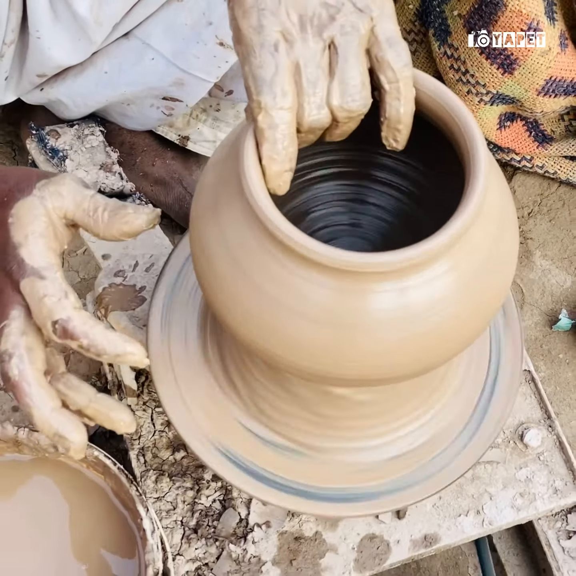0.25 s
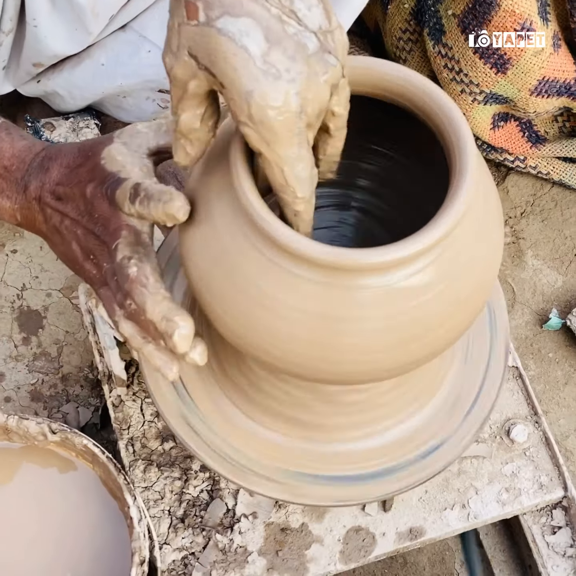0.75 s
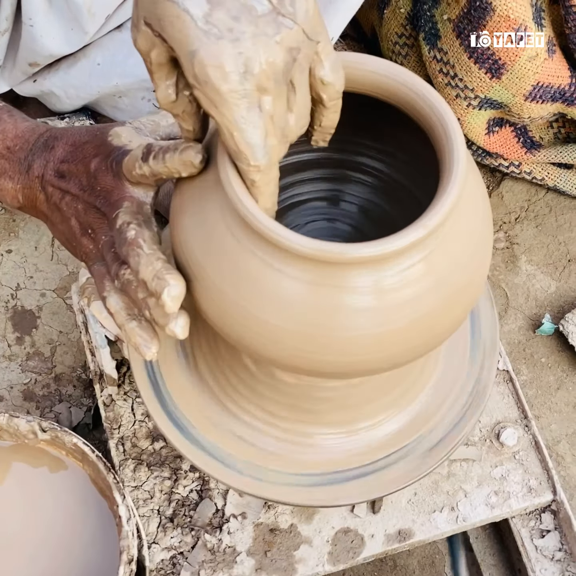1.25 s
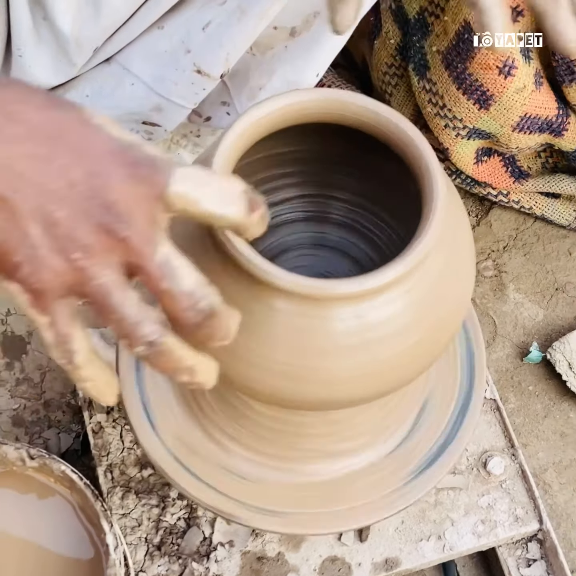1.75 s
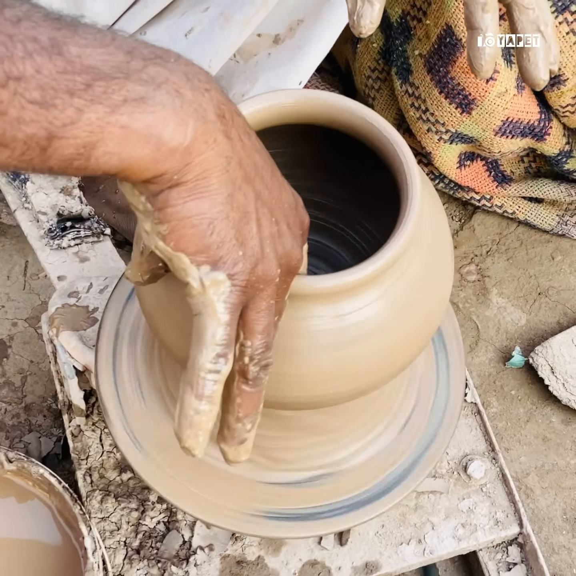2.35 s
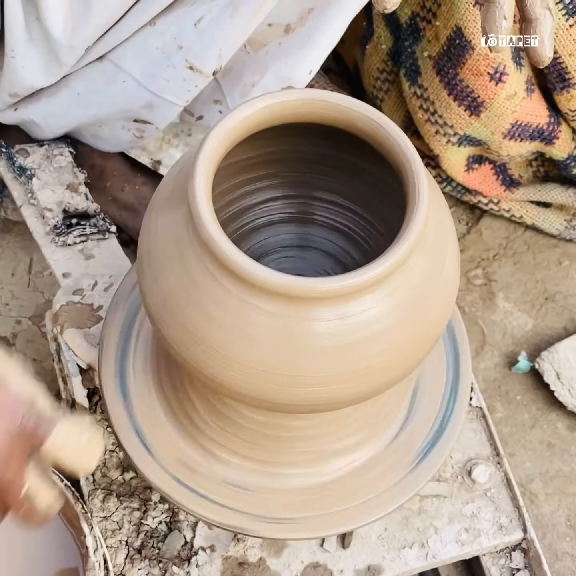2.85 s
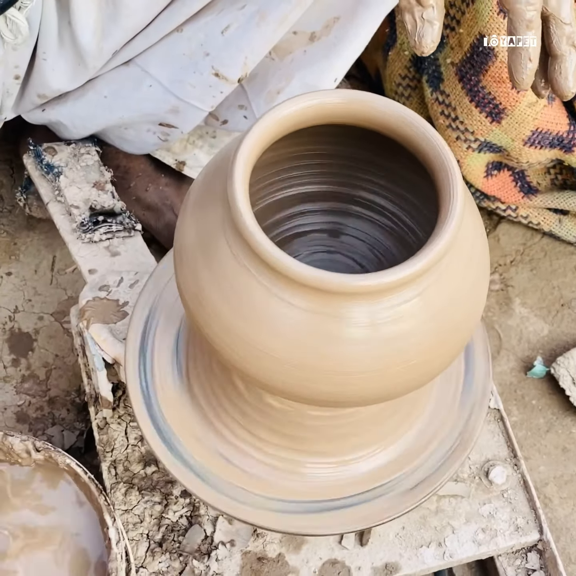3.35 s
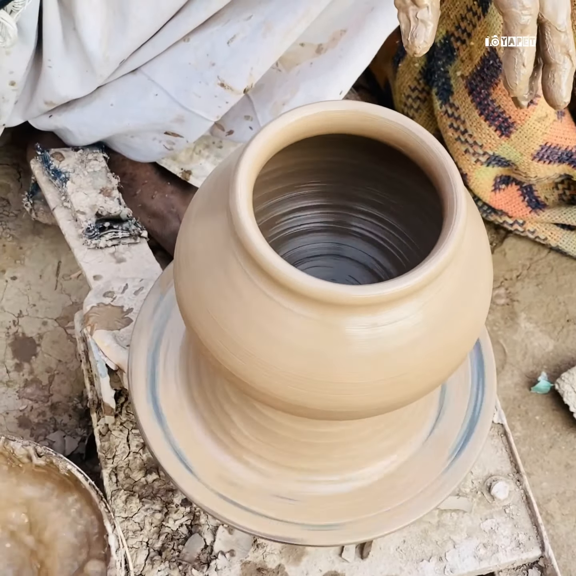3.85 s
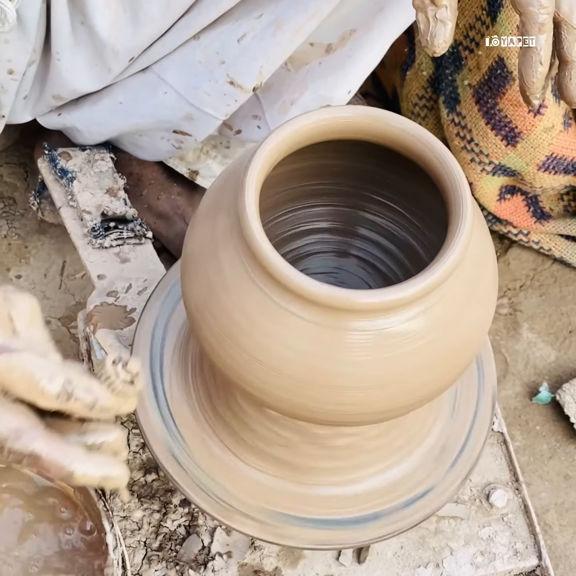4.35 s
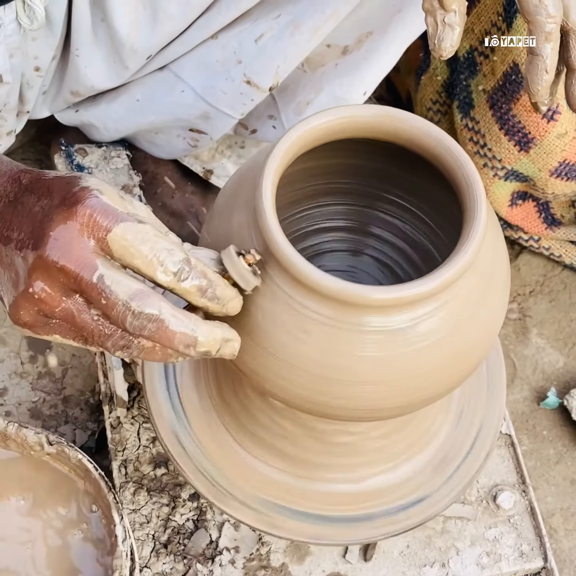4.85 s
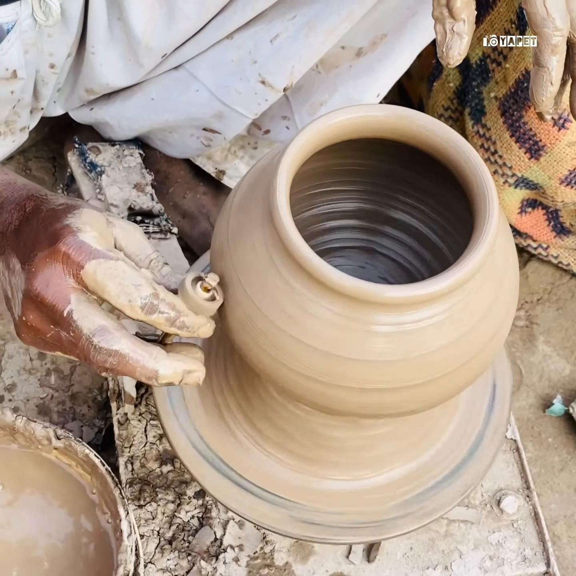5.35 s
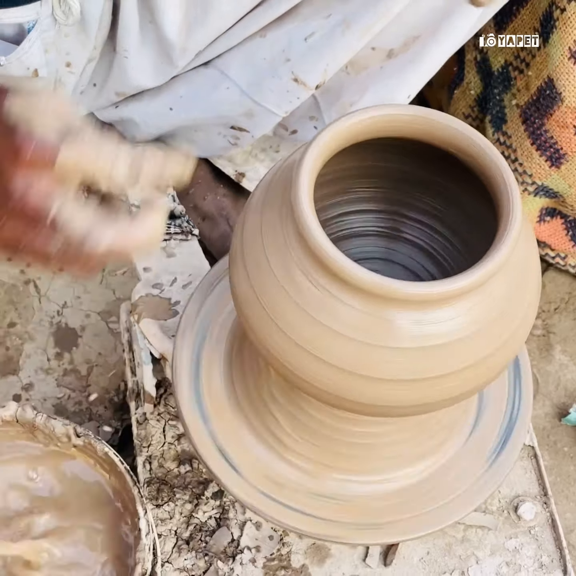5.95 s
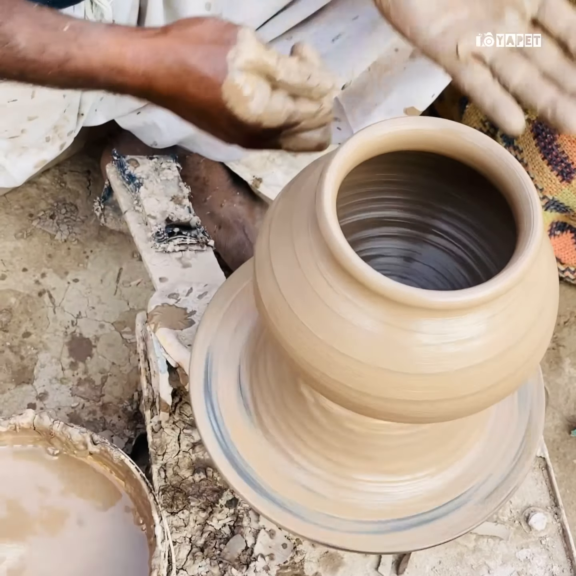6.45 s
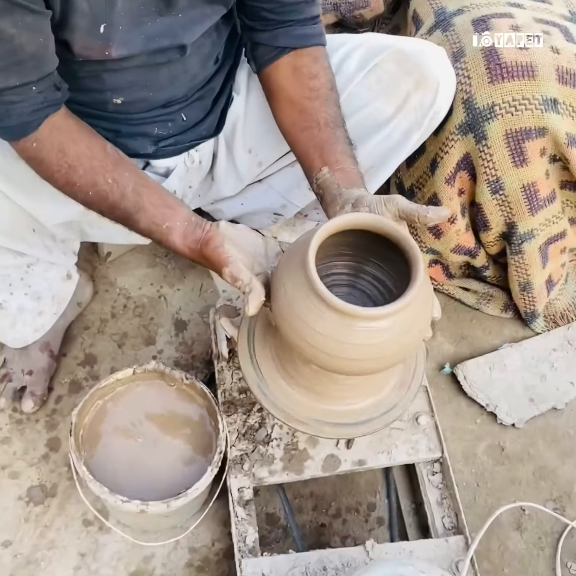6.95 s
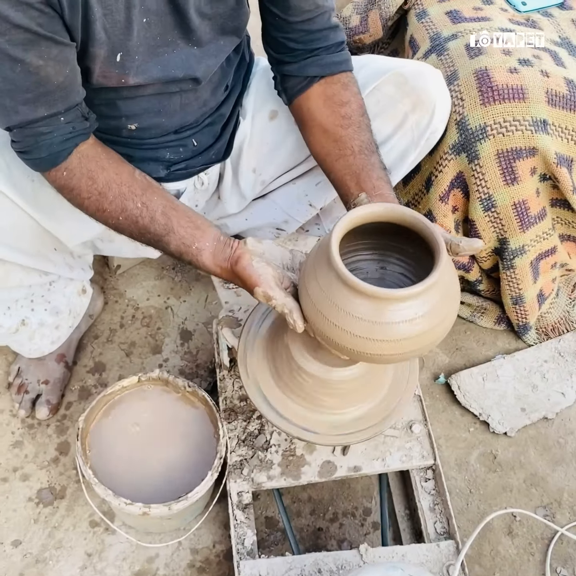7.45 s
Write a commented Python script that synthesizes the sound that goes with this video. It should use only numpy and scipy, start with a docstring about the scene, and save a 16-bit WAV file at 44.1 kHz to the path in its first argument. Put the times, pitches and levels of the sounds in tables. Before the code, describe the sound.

An electric potter's wheel whirs steadily with a throbbing mid-pitched hum, while wet hands make faint ticks, splashes and a few watery plops outdoors.

```python
"""The rolling noise and throbbing hum of an electric potter's wheel in an open yard, with water and far traffic.
Bearing and belt noise rings the motor housing; a loose part hums as wandering tones that throb with the belt.
There is also a thin fading whine, a hiss, and a hollow rush of resonant noise that swells at the end.
Wet hands dip in a bucket: bubbles plop as rising tones, water splashes as noise and drops tick as short tones.
Far traffic lies behind: rumble and tyre roar made of shaped noise, and two engine drones of wavering pitch."""
import sys
import numpy as np
from scipy import signal
from scipy.fft import rfft, irfft, next_fast_len
from scipy.io import wavfile

SR = 44100
rng = np.random.default_rng(int(sys.argv[2]) if len(sys.argv) > 2 else 0)


def log_audio(samples):
    """Write samples as a 16-bit WAV file to the path given in sys.argv[1]."""
    # one column per channel
    frames = np.atleast_2d(samples).T
    # limit to full scale, then quantise
    limited = np.clip(frames, -1, 1)
    pcm = np.round(limited * 32767).astype(np.int16)
    wavfile.write(sys.argv[1], SR, pcm)


N = 339129  # length in samples

# the wheel's drive: time_s, rolling_level_db, hiss_level_db
DRIVE_LEVELS = [(0.0, -33.5, -45.5), (0.5, -33.5, -48), (3.55, -33.5, -48), (4.03, -33.2, -46),
                (4.4, -34.5, -48), (5.4, -34.5, -47.5), (6.75, -33, -47), (7.11, -34, -48),
                (7.69, -31.5, -48)]
# ways the motor housing rings: pitch_hz, width_hz, relative_level_db
HOUSING_MODES = [(530, 98, -10), (595.5, 115, -8), (673, 38, -7), (788.5, 64, -16), (950, 155, -19.5),
                 (1220, 147, -19), (1366, 134, -15), (1493, 230, -22.5), (1789, 35, -19.5),
                 (1910, 40, -7.5), (1987, 88, -10), (2128, 176, -23), (2320, 31.5, -10), (2746, 37, -30),
                 (2973, 83, -26.5), (3320, 50, -27.5), (3653, 170, -28), (3915, 205, -27), (4020, 178, -24),
                 (4246, 127, -25.5), (4840, 81, -36.5), (5650, 250, -36.5), (6690, 160, -42.5),
                 (8430, 72, -32)]
# the hum, swelling unevenly about twice a second: time_s, level_db (before throbs and flicker)
HUM_LEVELS = [(0.0, -33.0), (0.56, -31.5), (0.86, -40), (0.94, -34.5), (1.19, -35), (1.43, -44.0),
              (1.58, -30.5), (1.76, -49.5), (2.04, -30), (2.13, -40.5), (2.42, -34.5), (2.53, -37.5),
              (2.85, -35.5), (3.26, -42.5), (3.5, -31.5), (3.67, -42), (3.98, -31), (4.18, -41.5),
              (4.57, -33.5), (4.85, -50.0), (5.05, -32.5), (5.36, -42), (5.52, -35), (5.69, -38.5),
              (6.04, -34), (6.51, -39.5), (6.66, -33.5), (7.16, -45), (7.31, -32.5), (7.48, -47.5),
              (7.69, -50.0)]
# throbs of the hum, from the belt's turn and a slower pulley: rate_hz, depth_0_to_1, phase_rad
HUM_THROBS = [(8.385, .5, -0.23), (6.52, 0.22, 2.3)]
# a thin whine that fades: time_s, level_db
WHINE_LEVELS = [(0, -51), (1.0, -57), (1.5, -65), (1.9, -77), (7.69, -80)]
# tone colour of the hiss: pitch_hz, relative_level_db (per Hz)
HISS_COLOUR = [(1470, -23), (2500, -2.5), (3410, -13.5), (4160, -4.5), (4610, -12), (7550, -15),
               (8620, -10), (14400, -16.5), (15900, -26)]
# a hollow rush that swells at the end: time_s, level_db
RUSH_LEVELS = [(0, -80), (6.75, -58), (6.95, -46.5), (7.35, -43.5), (7.69, -39)]
# resonances of the rush: pitch_hz, width_hz, relative_level_db
RUSH_RESONANCES = [(365, 38, 5.5), (593, 83, -7.5), (985, 130, -2.5), (1230, 120, -0.5)]
# bubbles in the bucket: start_s, peak_db, start_pitch_hz, pitch_rise_per_s (share of start pitch), fall_60_db_s
BUBBLES = [(3.922, -19.5, 1114, 30, 0.04), (4.118, -15.5, 950, 120, 0.019), (4.176, -24.5, 900, 78, 0.044),
           (5.461, -26, 1200, 29.8, .03), (7.515, -26, 890, 30, 0.032)]
# the clearest droplets and wet chirps: centre_s, peak_db, pitch_hz, length_s
DROPLETS = [(0.047, -31.5, 8730, 0.018), (0.06, -34, 3760, 0.01), (0.065, -36.5, 7360, 0.021),
            (0.073, -37, 3590, 0.006), (0.218, -45, 8530, 0.016), (0.978, -42, 8830, 0.0099),
            (1.015, -41.5, 7200, 0.022), (1.241, -43, 8560, 0.017), (1.651, -42, 8750, 0.006),
            (2.258, -42, 8510, 0.015), (2.321, -41, 8560, 0.006), (2.474, -37, 6640, 0.008),
            (2.517, -43, 6930, 0.009), (3.141, -41, 7590, 0.007), (3.488, -41, 8410, 0.006),
            (3.679, -42, 11290, 0.022), (3.896, -34, 2930, 0.008), (3.91, -34, 4860, 0.01),
            (3.916, -45, 6680, 0.024), (3.922, -31, 5080, 0.0055), (3.947, -37, 7590, 0.006),
            (3.968, -39, 8600, 0.018), (4.029, -46, 6860, 0.016), (4.056, -44, 11150, 0.013),
            (4.067, -43, 7830, 0.005), (4.076, -39, 4620, 0.005), (4.076, -42, 6310, 0.006),
            (4.108, -31, 6200, 0.004), (4.113, -39, 6000, 0.004), (4.14, -27, 10300, 0.003),
            (4.173, -38, 13330, 0.005), (4.183, -32, 9360, 0.003), (4.193, -39, 5070, 0.005),
            (4.33, -37.5, 8620, 0.012), (5.136, -42, 5260, 0.009), (5.518, -42, 7660, 0.014),
            (5.743, -42, 6790, 0.009), (5.831, -39, 13300, 0.007), (6.245, -37, 3430, 0.009),
            (6.245, -42, 4610, 0.02), (6.25, -36, 7200, 0.053), (6.251, -42, 10630, 0.019),
            (6.252, -43, 14120, 0.019), (6.26, -42, 8850, 0.019), (6.376, -42, 8120, 0.021),
            (6.403, -41, 8430, 0.008), (6.501, -40, 5760, 0.006), (6.551, -41, 4910, 0.03),
            (6.705, -41, 11000, 0.007), (6.78, -40, 6300, 0.017), (6.807, -39.5, 5190, 0.028),
            (6.89, -41, 5100, 0.009), (6.92, -45, 4700, 0.005), (6.99, -40, 8480, 0.015),
            (7.034, -44, 8460, 0.01), (7.143, -44, 4680, 0.01), (7.302, -39, 6750, 0.015),
            (7.338, -36, 8000, 0.01), (7.522, -36, 7600, 0.025), (7.523, -37.5, 4820, 0.029),
            (7.672, -37, 9000, 0.009), (7.678, -39, 4770, 0.009)]
# broad splashes and smacks of wet skin: centre_s, level_db, length_s
WATER_SPLASHES = [(0.06, -43, .035), (2, -46, .03), (2.09, -46, 0.011), (3.07, -47, .01),
                  (3.252, -45, .015), (3.625, -43, 0.011), (3.678, -42, .012), (3.852, -45, 0.027),
                  (3.892, -44, .008), (3.923, -44, .035), (3.962, -41, .02), (4.05, -48, .015),
                  (4.074, -40, 0.0064), (4.137, -38, .008), (4.158, -45, 0.025), (4.196, -43, 0.018),
                  (5.118, -46, 0.028), (5.465, -47, .01), (5.83, -44, .015), (6.25, -45, .035),
                  (6.381, -51, 0.045), (6.55, -47, .025), (6.69, -47, 0.036), (6.788, -40, .025),
                  (7.342, -41, .02), (7.363, -45, .008), (7.519, -42, .025), (7.665, -45, 0.028)]
# far traffic: time_s, rumble_level_db, roar_level_db
TRAFFIC_LEVELS = [(0, -51, -48.5), (.4, -50, -45), (1.1, -48.5, -49.5), (2.2, -47.5, -48),
                  (3.0, -48.5, -48), (4.3, -51.5, -47), (5.4, -51.5, -50.5), (5.9, -54, -48.5),
                  (6.9, -53.5, -50), (7.69, -52.5, -52)]
# tone colour of the traffic rumble: pitch_hz, relative_level_db (per Hz)
RUMBLE_COLOUR = [(25, -44), (45, -38), (62, -11), (80, -0.5), (110, -3.5), (160, 0.5), (260, -6),
                 (500, -27)]
# tone colour of the tyre roar: pitch_hz, relative_level_db (per Hz)
ROAR_COLOUR = [(120, -21), (220, -4.5), (330, -1), (400, -2.5), (450, -11.5), (800, -9.5), (2000, -19.5),
               (5000, -53)]
# an engine drone: time_s, pitch_hz, level_db (before flicker)
ENGINE_DRONE = [(0, 165.8, -61), (.35, 163, -49.5), (1.1, 154.3, -54.5), (2.2, 165.6, -72), (3.0, 172, -70),
                (3.4, 178, -51), (4.1, 181, -59), (4.5, 186.3, -54.5), (5.4, 187.5, -60.5),
                (7.69, 189, -61.5)]
# a second, lower engine drone: time_s, pitch_hz, level_db (before flicker)
LOW_ENGINE_DRONE = [(0, 100.3, -67), (.6, 100, -58), (1.9, 90, -61), (2.25, 102.4, -58), (2.7, 112, -61),
                    (3.6, 140, -63), (4.3, 148, -60.5), (5.5, 150.7, -56), (6.8, 150, -61.5),
                    (7.69, 151, -71)]

SHAFT_HZ, SHAFT_PHASE_RAD, SHAFT_DEPTH_DB = 27.66, 2.74, 1.0  # the level goes this far up and down
HUM_HZ, PARTNER_BELOW_HZ, WHINE_HZ = 685.4, 23.16, 1667
DROP_BLUR_HZ, WET_BLUR_HZ = 30, 160  # pitch blur of a lone drop, and what a splash adds to it
# tiny drops: steady rate, extra rate at the middle of each splash, length of the extra
SPECKS_PER_S, SPECKS_PER_SPLASH_S, SPRAY_SPREAD_S = 6.0, 110.0, 0.1
BASS_CUT_HZ, TREBLE_CUT_HZ = 45, 16000


def amp(db):
    """Turn decibels into a plain multiplier."""
    return 10 ** (np.asarray(db) / 20)


def rms_one(x):
    """Scale a sound to an average (rms) level of 1."""
    return x / np.sqrt(np.mean(x ** 2) + 1e-20)


def in_time(rows):
    """Join a table's points with straight lines, one curve for each column after the time."""
    time_s, *columns = np.transpose(rows)
    return [np.interp(np.arange(N) / SR, time_s, column) for column in columns]


def drift(rate_hz):
    """Slow chance: noise passed twice through a one-pole low-pass, scaled to a spread of 1."""
    r = np.exp(-2 * np.pi * rate_hz / SR)
    noise = rng.standard_normal(N + SR)
    return rms_one(signal.lfilter([1], [1, -2 * r, r * r], noise)[SR:])  # skip the first second: run-in


def coloured(colour):
    """Noise whose strength at each pitch follows the table; rms 1."""
    size = next_fast_len(N)
    hz, db = np.transpose(colour)
    all_hz = np.linspace(1, SR / 2, size // 2 + 1)
    gain = amp(np.interp(np.log(all_hz), np.log(hz), db))
    return rms_one(irfft(rfft(rng.standard_normal(size)) * gain, size)[:N])


def wavering(hz, waver_hz, rate_hz):
    """A sine of rms 1 whose pitch wanders by chance around hz."""
    pitch = hz + waver_hz * drift(rate_hz)
    return np.sqrt(2) * np.sin(2 * np.pi * np.cumsum(pitch) / SR)


def resonance(x, hz, width_hz):
    """A two-pole filter that rings at one pitch, with gain 1 at its top."""
    r = np.exp(-np.pi * width_hz / SR)
    feed = np.array([1, 0, -1]) * (1 - r * r) / 2
    return signal.lfilter(feed, [1, -2 * r * np.cos(2 * np.pi * hz / SR), r * r], x)


def modes(x, table, patchy_db):
    """Resonances side by side, neighbours in opposite phase, each waxing and waning on its own."""
    total = np.zeros(N)
    for k, (hz, width_hz, db) in enumerate(table):
        level = amp(db + patchy_db * drift(3.7))
        total += (-1) ** k * level * resonance(x, hz, width_hz)
    return total


def swell(centre_s, length_s):
    """A bell-shaped rise and fall around one moment."""
    return np.exp(-8 * ((np.arange(N) / SR - centre_s) / length_s) ** 2)


def shaft(lag_rad):
    """The level swells once a turn of the motor shaft."""
    turn = 2 * np.pi * SHAFT_HZ * np.arange(N) / SR
    return amp(SHAFT_DEPTH_DB * np.cos(turn + SHAFT_PHASE_RAD - lag_rad))


def housing(rolling_db):
    """Dense uneven rolling contacts of bearing and belt excite every mode of the motor housing."""
    contacts = rng.standard_normal(N) * amp(0.6 * drift(170)) * shaft(0)
    ringing = modes(contacts, HOUSING_MODES, patchy_db=0.83)
    band = signal.butter(4, [470, 9500], "band", fs=SR, output="sos")
    return amp(rolling_db) * rms_one(signal.sosfilt(band, ringing))


def hum(partner_db=-9):
    """A loose mode hums and throbs with the belt; a weaker tone just below beats against it."""
    t = np.arange(N) / SR
    throb = 1 + sum(depth * np.cos(2 * np.pi * rate * t + phase) for rate, depth, phase in HUM_THROBS)
    throb = np.maximum(throb, 0.03)  # never quite silent
    main = wavering(HUM_HZ, 6.35, 12.2)
    partner = amp(partner_db) * wavering(HUM_HZ - PARTNER_BELOW_HZ, 5.17, 11.6)
    flickering_level = amp(in_time(HUM_LEVELS)[0] + 1.63 * drift(34))
    return flickering_level * throb * shaft(0.05) * (main + partner)


def whine():
    """A thin sine of slightly wandering pitch that fades away."""
    return amp(in_time(WHINE_LEVELS)[0]) * wavering(WHINE_HZ, 4.9, 17)


def hiss(hiss_db):
    """Shaped noise whose level flickers a little."""
    return amp(hiss_db + 1.08 * drift(26)) * coloured(HISS_COLOUR)


def rush():
    """Noise ringing in a few broad resonances sounds hollow."""
    hollow = modes(rng.standard_normal(N), RUSH_RESONANCES, patchy_db=3.5)
    return amp(in_time(RUSH_LEVELS)[0]) * rms_one(hollow)


def plops():
    """A bubble rings briefly and rises in pitch as it nears the surface."""
    out = np.zeros(N + SR)
    t = np.arange(SR // 10) / SR
    for start_s, db, hz, rise, fall_s in BUBBLES:
        tone = np.sin(2 * np.pi * hz * (t + rise * t * t / 2))
        onset = np.minimum(t / 0.00067, 1)
        out[round(start_s * SR):][:len(t)] += tone * amp(db - 60 * t / fall_s) * onset
    return out[:N]


def drops(rise_per_s=0.86):
    """Each droplet is a short tone rising a little; a random walk of phase blurs its pitch."""
    out = np.zeros(N + SR)
    t = np.arange(-SR // 30, SR // 30) / SR  # time around the droplet's centre
    for centre_s, db, hz, length_s in DROPLETS:
        in_splash = any(abs(centre_s - at) < span / 2 for at, _, span in WATER_SPLASHES)
        blur_hz = DROP_BLUR_HZ + in_splash * WET_BLUR_HZ
        walk = np.cumsum(rng.standard_normal(len(t)))
        phase = 2 * np.pi * hz * (t + rise_per_s * t * t / 2) + np.sqrt(2 * np.pi * blur_hz / SR) * walk
        envelope = amp(db) * np.exp(-8 * (t / length_s) ** 2)
        out[round((centre_s + t[0]) * SR):][:len(t)] += envelope * np.sin(phase)
    return out[:N]


def splashes():
    """Bright grainy noise under a short swell for each splash or smack."""
    grainy = rng.standard_normal(N) * amp(3.3 * drift(400))
    band = signal.butter(2, [3500, 14000], "band", fs=SR, output="sos")
    level = sum(amp(db) * swell(centre_s, length_s) for centre_s, db, length_s in WATER_SPLASHES)
    return rms_one(signal.sosfilt(band, grainy)) * level


def spray(level_db=-46, tick_s=0.0041):
    """Tiny droplets tick at random moments, thicker round each splash, spread over the treble."""
    extra = sum(swell(centre_s, SPRAY_SPREAD_S) for centre_s, _, _ in WATER_SPLASHES)
    rate = SPECKS_PER_S + SPECKS_PER_SPLASH_S * extra
    born = (rng.random(N) < rate / SR) * amp(level_db + 3.0 * rng.standard_normal(N))
    pitch_choice = rng.integers(0, 12, N)  # each droplet gets one of 12 pitches
    soft = np.hanning(round(tick_s * SR))
    t = np.arange(len(soft)) / SR
    out = np.zeros(N)
    for k, hz in enumerate(np.geomspace(4500, 13500, 12)):
        tick = soft * np.sin(2 * np.pi * hz * t)
        out += signal.oaconvolve(born * (pitch_choice == k), tick)[:N]
    return out


def traffic():
    """Far rumble and tyre roar are shaped noise; two engines drone as tones of wavering pitch and level."""
    rumble_db, roar_db = in_time(TRAFFIC_LEVELS)
    hz, drone_db = in_time(ENGINE_DRONE)
    low_hz, low_db = in_time(LOW_ENGINE_DRONE)
    drone = amp(drone_db + 3.8 * drift(11.0)) * wavering(hz, 6.1, 10.83)
    low_drone = amp(low_db + 5.1 * drift(4.6)) * wavering(low_hz, 5.44, 8)
    rumble = amp(rumble_db) * coloured(RUMBLE_COLOUR)
    roar = amp(roar_db) * coloured(ROAR_COLOUR)
    return rumble + drone + low_drone + roar


def scene():
    """Add up the wheel, the water and the far traffic."""
    rolling_db, hiss_db = in_time(DRIVE_LEVELS)
    wheel = housing(rolling_db) + hum() + whine() + hiss(hiss_db) + rush()
    water = plops() + drops() + splashes() + spray()
    return (wheel + water + traffic())[None]


def record(dry):
    """The microphone drops the deep bass; the top is cut steeply."""
    bass_cut = signal.butter(2, BASS_CUT_HZ, "high", fs=SR, output="sos")
    treble_cut = signal.ellip(12, 0.5, 70, TREBLE_CUT_HZ, fs=SR, output="sos")
    return signal.sosfilt(treble_cut, signal.sosfilt(bass_cut, dry))


dry = scene()
out = record(dry)
log_audio(out)
```